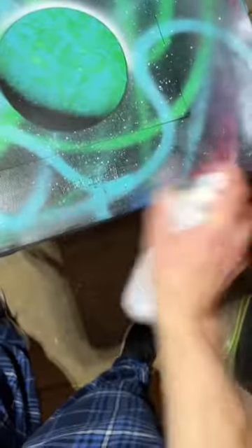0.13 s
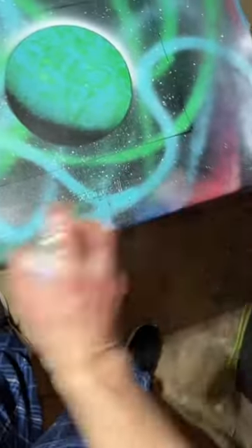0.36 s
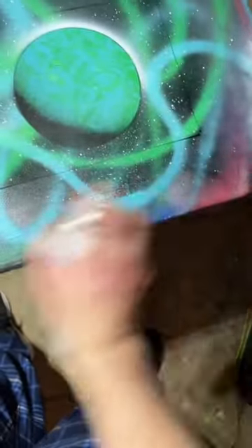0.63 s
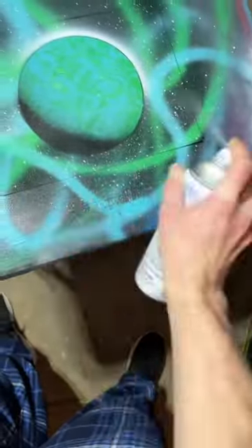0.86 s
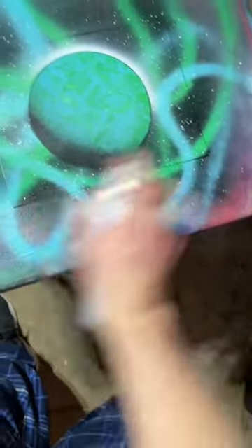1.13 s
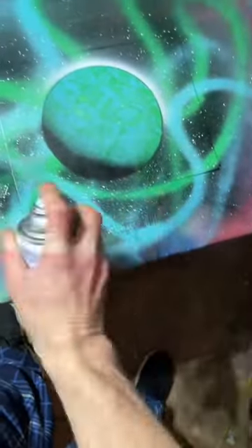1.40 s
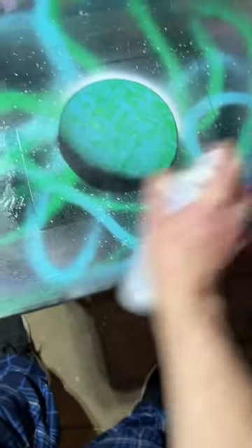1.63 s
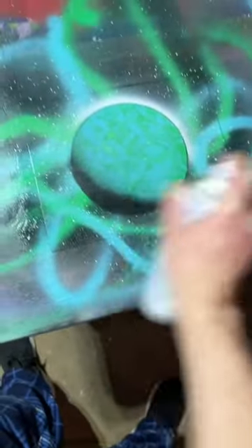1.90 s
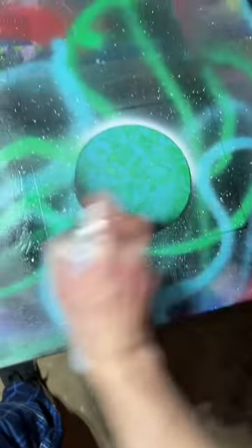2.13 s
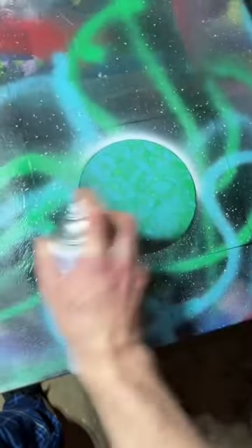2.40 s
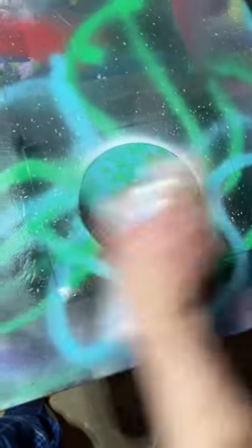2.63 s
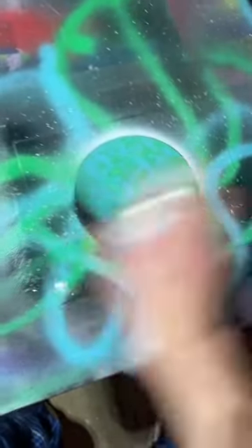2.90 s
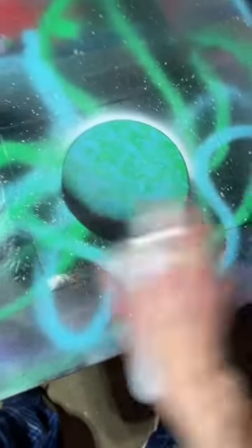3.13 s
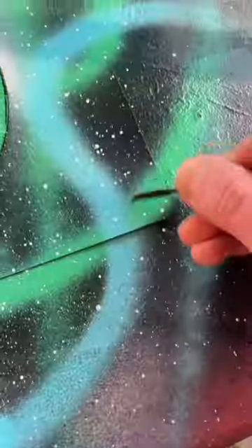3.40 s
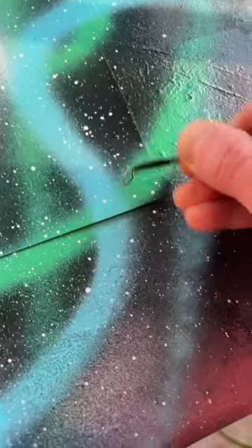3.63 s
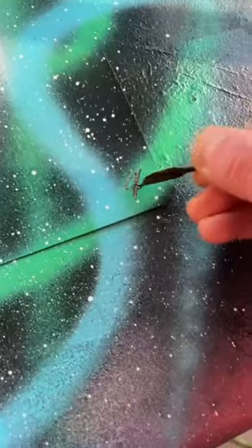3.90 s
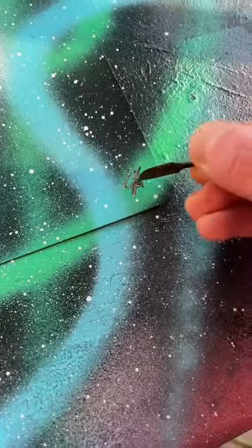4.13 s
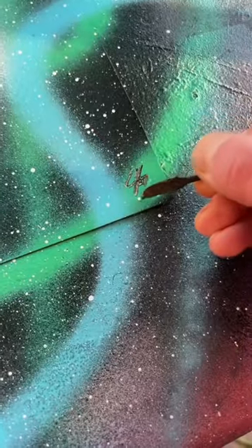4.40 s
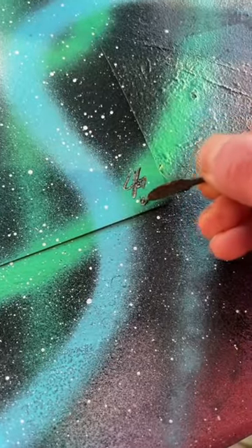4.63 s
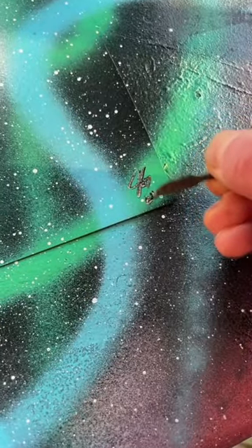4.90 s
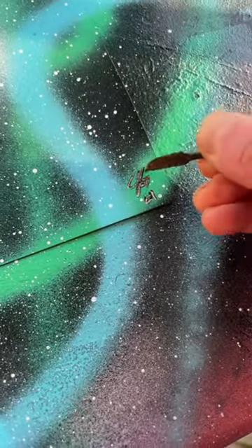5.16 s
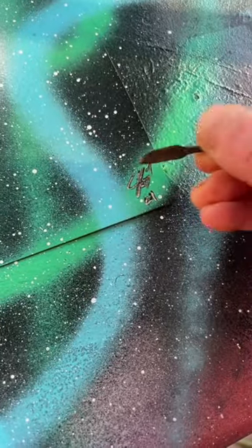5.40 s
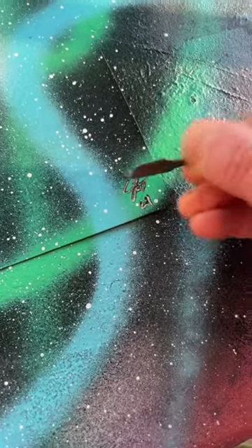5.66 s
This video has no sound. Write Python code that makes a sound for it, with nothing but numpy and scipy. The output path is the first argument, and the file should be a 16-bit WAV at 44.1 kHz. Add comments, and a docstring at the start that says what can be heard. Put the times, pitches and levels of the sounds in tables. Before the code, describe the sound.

Fast, irregular clacking of a ball inside a shaken spray can, then suddenly much quieter: small gritty scrapes, ticks and soft thuds over faint low hum.

```python
"""A mixing ball knocks about inside a shaken paint can: each blow rings wall modes, ticks and leaves a wash.
Light spray hiss, made of flickering coloured noise, and a low noise rumble accompany it.
The scene then changes to a quieter one: a thin blade scratches wet paint in short strokes of gritty noise,
with ticks and sinking board thuds, over a low wavering sine hum and steady air noise."""
import sys
import numpy as np
from scipy import signal
from scipy.io import wavfile
from scipy.ndimage import uniform_filter1d

SR = 44100
rng = np.random.default_rng(int(sys.argv[2]) if len(sys.argv) > 2 else 0)


def field_ratio(decibels):
    """Amplitude ratio for a level in dB (20 dB per decade); scalars and array-likes work."""
    return 10 ** (np.asarray(decibels, dtype=float) / 20)


def digitize_waveform(pressure):
    """Quantize a signal to 16-bit integers and store it at the path in sys.argv[1].

    Rows of a 2-D input are taken as channels; values are limited to [-1, 1].
    """
    field = np.atleast_2d(pressure).T
    bounded = np.clip(field, -1, 1)
    quanta = np.round(bounded * 32767).astype(np.int16)
    wavfile.write(sys.argv[1], SR, quanta)


N = 254748
T = np.arange(N) / SR
# Ball strikes on the steel wall. Each row: start in seconds, ring level in dB, ring centre in Hz,
# crack level in dB before any lift, crack centre in Hz.
BALL_STRIKES = [(.078, -12, 1600, -27.5, 9300), (.083, -29, 1840, -36, 8810),
                (0.111, -21.5, 1500, -35, 8700), (.13, -31, 1770, -44, 9260), (.17, -33, 2230, -20.5, 3520),
                (.2, -22.5, 1390, -43, 9080), (.219, -26, 1820, -49, 8680), (.231, -30.5, 1150, -53, 8720),
                (.308, -19, 2010, -25.5, 3770), (.377, -18.5, 1380, -27.5, 7500),
                (.399, -24, 1880, -35, 9270), (.423, -33, 1010, -34, 8980), (.484, -22.5, 1740, -21, 3410),
                (.603, -16, 1510, -23.5, 3440), (0.646, -19.5, 2370, -23.5, 9540),
                (0.665, -16.5, 1690, -30, 5850), (.734, -24.5, 1560, -35, 9660),
                (.856, -39, 1970, -19, 3800), (0.95, -12.5, 1510, -26.5, 9200),
                (0.96, -26, 1550, -42, 9780), (.99, -18.5, 1380, -35, 9290),
                (1.025, -19, 2180, -26.5, 4020), (1.101, -24, 1300, -31, 9290),
                (1.13, -30, 1190, -34.5, 9500), (1.147, -30, 1260, -40, 9300),
                (1.199, -26, 2900, -19, 3720), (1.335, -14, 1580, -36, 7240), (1.343, -21, 1700, -47, 7200),
                (1.357, -22, 2340, -26.5, 5930), (1.38, -20, 1610, -38, 7190),
                (1.387, -26.5, 1650, -44, 7300), (1.427, -24.5, 1570, -44, 7320),
                (1.452, -27, 2240, -38, 9240), (1.546, -44.5, 2700, -21.5, 3800),
                (1.629, -18.5, 1380, -27, 9620), (1.662, -28, 1380, -47, 9270),
                (1.717, -17.5, 1940, -24, 9300), (1.835, -30.5, 1690, -38.5, 8860),
                (1.923, -25, 1840, -21, 4590), (1.984, -18, 1860, -27.5, 9310),
                (2.009, -29.5, 1150, -36, 8820), (2.033, -31.5, 1150, -36, 9120),
                (2.073, -17.5, 1990, -22.5, 4150), (2.147, -19, 1970, -36, 8940),
                (2.18, -23.5, 1670, -49, 7980), (2.209, -19, 1880, -18, 7600),
                (2.303, -19.5, 1760, -33.5, 9350), (2.323, -26.5, 1170, -35, 8930),
                (2.381, -19, 1610, -21.5, 7160), (2.451, -23.5, 1300, -33.5, 7640),
                (2.477, -29, 1150, -31, 9270), (2.489, -33, 1170, -40, 3640),
                (2.513, -21.5, 1730, -17.5, 4340), (2.587, -22.5, 1690, -36, 9450),
                (2.596, -21.5, 1690, -33, 9260), (2.684, -16, 2130, -22.5, 7170),
                (2.73, -27.5, 1180, -28.5, 3160), (2.748, -29.5, 1040, -33, 6950),
                (2.777, -22.5, 1740, -19, 9620), (2.814, -25, 1680, -28.5, 7100),
                (2.828, -23.5, 1670, -31.5, 8990), (2.915, -20.5, 1920, -26, 8100),
                (2.972, -16, 1650, -30, 6100), (2.986, -20, 1730, -20, 4700),
                (3.002, -21, 1750, -20.5, 4610), (3.013, -15, 3120, -35, 3360),
                (3.018, -18.5, 1750, -25.5, 3390), (3.031, -23, 1700, -35, 3500),
                (3.108, -18, 2320, -31, 4430), (3.135, -21, 1530, -44, 4530), (3.148, -31, 1640, -38, 9820),
                (3.201, -33, 1820, -19.5, 4740), (3.223, -12, 1920, -25, 4180),
                (3.243, -20, 2030, -34, 7640), (3.264, -22, 1670, -47, 8990), (3.281, -19, 1640, -37, 9760),
                (3.34, -29, 1670, -21.5, 4670), (3.366, -26, 1790, -25, 6200)]


def evened(x):
    """Scales to rms 1."""
    return x / np.sqrt(np.mean(x ** 2) + 1e-20)


def add(mix, s, sound):
    """Mixes a sound in at time s, in seconds."""
    part = mix[max(round(s * SR), 0):][:len(sound)]
    part += sound[:len(part)]


def noise(colour, patchy_db, size=512):
    """Random short-time spectra of a given colour, with drifting louder and softer patches; rms 1."""
    hz = np.fft.rfftfreq(size, 1 / SR)
    frames = 4 * N // size + 5
    real, imaginary, patches = rng.standard_normal((frames, len(hz), 3)).T
    patches = uniform_filter1d(patches, size // 64, 0)  # smooth across frequency
    patches = evened(uniform_filter1d(patches, 8192 // size, 1))  # smooth across time
    colour_hz, colour_db = np.transpose(colour)
    shape_db = np.interp(np.log(hz + 1), np.log(colour_hz + 1), colour_db)[:, None]
    spectra = (real + 1j * imaginary) * field_ratio(shape_db + patchy_db * patches)
    return evened(signal.istft(spectra, nperseg=size, noverlap=3 * size // 4)[1][:N])


def spatter(depth_db, per_s):
    """A flickering gain: random decibels smoothed over 1 / per_s seconds, mean power 1."""
    flicker = uniform_filter1d(rng.standard_normal(N), max(int(SR / per_s), 1))
    return evened(field_ratio(depth_db * evened(flicker)))


def air():
    """Steady background air: noise weighted to the bass."""
    # Spectrum of the air. Each row: frequency in Hz, relative density in dB per Hz.
    colour = [(18, -57), (30, -13), (86, -5.5), (146, -1.5), (206, -9.5), (340, -14.5), (1060, -14),
              (2000, -19.5), (2890, -32.5), (4770, -40), (8310, -41.5), (13700, -39.5), (15200, -38),
              (16500, -56)]
    return field_ratio(-50.5) * noise(colour, patchy_db=0.5, size=2048)


def rumble():
    """Low workshop noise that swells with the arm swings, rising and falling exponentially in dB."""
    # Spectrum of the rumble. Each row: frequency in Hz, relative density in dB per Hz.
    colour = [(20, -14), (40, -6), (74, 8.5), (110, -11.5), (180, -32), (400, -32)]
    # Swells of the rumble. Each row: centre in seconds, rise over the resting level in dB.
    swells = [(.53, 8), (.91, 6), (1.28, 7.5), (1.87, 11.5), (2.22, 6.5), (2.47, 15), (2.6, 8), (2.87, 9)]
    swell_db = sum(db * np.exp(-abs(T - s) / 0.057) for s, db in swells)
    return field_ratio(-57 + swell_db) * noise(colour, patchy_db=2, size=4096)


def hum():
    """A low sine that wavers in pitch and trembles in level."""
    # Path of the hum. Each row: time in seconds, pitch in Hz, relative level in dB.
    path = [(3.43, 138.2, -51), (3.48, 129.7, -61.5), (3.68, 143.6, -52), (3.8, 154.6, -52.5),
            (3.88, 136, -55), (4.01, 156.2, -48), (4.48, 156, -50), (4.6, 143.1, -64), (4.66, 131.2, -51),
            (4.72, 157.3, -49), (4.87, 158.6, -51.5), (4.93, 144.3, -59), (5.07, 139, -59),
            (5.17, 131.2, -46.5), (5.57, 129.8, -44.5), (5.61, 135, -49.5), (5.78, 131, -83.5)]
    s, hz, db = np.transpose(path)
    phase = 2 * np.pi * np.cumsum(np.interp(T, s, hz)) / SR
    level = np.sqrt(2) * field_ratio(np.interp(T, s, db))
    return level * np.sin(phase) * spatter(depth_db=1.5, per_s=17)


def thuds():
    """The board flexes under the blade: a decaying low sine whose pitch falls as the board settles."""
    # Board flexings. Each row: start in seconds, relative level in dB.
    flexings = [(3.452, -38), (3.957, -35), (4.441, -40), (4.519, -35), (4.58, -39), (4.645, -30.5),
                (4.79, -38), (4.924, -32), (5.325, -38), (5.56, -28), (5.668, -31)]
    board_hz, sag_per_s, t60_s = 122, 7.2, 0.063
    out = np.zeros(N)
    t = np.arange(SR // 5) / SR
    cycles = board_hz * (1 - np.exp(-sag_per_s * t)) / sag_per_s
    swing = (1 - np.exp(-t / 0.0039)) * np.sin(2 * np.pi * cycles)
    for s, db in flexings:
        add(out, s, field_ratio(db - 60 * t / t60_s) * swing)
    return out


def slips():
    """The blade tip snaps free: very short decaying noise, differentiated to brighten it."""
    # Snaps of the tip. Each row: start in seconds, relative level in dB.
    snaps = [(3.4745, -18), (3.697, -14), (3.7976, -46), (3.9317, -31), (3.9762, -30), (4.0637, -11.5),
             (4.2646, -15), (4.3697, -54), (4.4463, -55), (4.58, -41), (4.666, -18.5), (4.7105, -26),
             (4.835, -29), (4.95, -25), (4.9831, -27), (5.3548, -14), (5.689, -15)]
    out = np.zeros(N)
    t = np.arange(400) / SR
    for s, db in snaps:
        tick = np.diff(rng.standard_normal(400) * field_ratio(-60 * t / 0.003))
        add(out, s, field_ratio(db + 2) * tick / abs(tick).max())
    return out


def blade():
    """Scraping grit as flickering noise: each stroke swells and fades with its own treble balance."""
    # Blade strokes. Each row: centre in seconds, relative level in dB, length in ms,
    # tilt toward the lower treble in dB before a common lift.
    strokes = [(3.471, -32.5, 27.6, -1.5), (3.652, -62.5, 27, -1), (3.696, -35.5, 34, -5.5),
               (3.73, -60, 46, -2), (3.805, -57, 34, 2), (3.933, -30, 24.6, -5.5), (3.971, -55, 32, -2),
               (4.031, -64, 16, -5), (4.065, -30, 25, -7.5), (4.225, -67, 14.6, 3),
               (4.261, -30.5, 28.3, -10), (4.37, -60, 11.8, 2), (4.45, -63, 17, 2),
               (4.589, -43.5, 31, -4.5), (4.666, -47, 27, -4.5), (4.709, -46, 25, -12),
               (4.826, -43.5, 30.6, 0), (4.937, -35, 32.4, -5), (4.987, -39, 31, -17),
               (5.062, -67, 20, 4.5), (5.326, -64, 28, -6), (5.355, -34, 25.5, -3), (5.604, -68.5, 60, .5),
               (5.684, -33, 29.6, -5.5)]
    # Spectrum of the scrape. Each row: frequency in Hz, relative density in dB per Hz.
    colour = [(880, -54), (1500, -22), (3550, -15), (4010, -5), (5990, -8), (8770, -11.5), (9690, -6.5),
              (10500, -20), (14300, 2), (16000, -3.5), (16500, -28)]
    dull, bright = np.zeros((2, N))
    for s, db, ms, tilt_db in strokes:
        along = (T - s) / (ms / 2000)  # -1 at the start, 1 at the end
        squareness = np.interp(db, [-45, -28], [2.1, 1.73])  # harder strokes swell to a sharper point
        swell_db = db - 14 * abs(along) ** squareness
        dull += field_ratio(swell_db + tilt_db + 5)
        bright += field_ratio(swell_db)
    grit = noise(colour, patchy_db=2, size=256) * spatter(depth_db=3, per_s=2500)
    low = signal.sosfiltfilt(signal.butter(2, 9000, fs=SR, output="sos"), grit)
    drag = field_ratio(-19.5) * uniform_filter1d(bright, 2500) * grit  # faint, before and after each stroke
    return dull * low + bright * (grit - low) + drag


def spray():
    """Gas and droplets hiss through the nozzle: each shake refills the flow, which then sags."""
    # Spectrum of the hiss. Each row: frequency in Hz, relative density in dB per Hz.
    colour = [(120, -7), (200, -16.5), (860, -10.5), (1090, -7), (1440, -6), (1700, -8), (2330, -2),
              (3020, -12), (3910, -4), (5450, -9), (9310, -0.5), (11200, -8), (14000, 3), (15600, 2.5),
              (16500, -25)]
    # Shakes that throw paint at the valve. Each row: start in seconds, sag in dB per second.
    surges = [(0, 96), (.078, 17), (.17, 9), (.307, 18), (.484, 50), (.645, 9), (.855, 70), (1.025, 21),
              (1.197, 28), (1.335, 10), (1.546, 57), (1.631, 52), (1.717, 9.5), (1.923, 22), (2.073, 13.5),
              (2.21, 40), (2.381, 47), (2.513, 18), (2.777, 38), (2.915, 76), (2.985, 17), (3.107, 34),
              (3.2, 8)]
    # Shakes just before which the valve starves. Each entry: time in seconds.
    chokes = [.169, .307, .855, .95, 1.544, 1.923, 2.915, 3.107]
    full_db, lowest_sag_db = -33.5, -35.5
    choke_s, choke_db = 0.054, -5
    start, sag_db = np.transpose(surges)
    last = np.clip(np.searchsorted(start, T) - 1, 0, None)
    flow_db = np.maximum(full_db - sag_db[last] * (T - start[last]), lowest_sag_db)
    for s in chokes:
        flow_db += choke_db * np.clip(1 - (s - T) / choke_s, 0, 1) * (T < s)
    flow = field_ratio(uniform_filter1d(flow_db, size=200))
    return flow * noise(colour, patchy_db=2.67) * spatter(depth_db=1.08, per_s=790)


def thumps():
    """Dull push of the heavier blows through can and hand: very short decaying sines."""
    # Heavier blows. Each row: start in seconds, level in dB before a common lift.
    pushes = [(.198, -41), (.306, -29), (.373, -33.5), (1.098, -33.5), (1.129, -39), (1.332, -32.5),
              (1.718, -34.5), (1.984, -39), (2.07, -32.5), (2.145, -28), (2.175, -32.5), (2.38, -25.5),
              (2.449, -35), (2.477, -36), (2.488, -38), (2.585, -35), (2.682, -26), (2.727, -29.5),
              (2.748, -33), (2.969, -25.5), (3.107, -31.5), (3.131, -31.5), (3.221, -31)]
    out = np.zeros(N)
    t = np.arange(SR // 4) / SR
    for s, db in pushes:
        add(out, s + 0.002, field_ratio(db + 4.5 - 60 * t / 0.006) * np.sin(2 * np.pi * 690 * t))
    return out


def wash():
    """Each blow leaves a dying, flickering noise whose power follows its crack and, less, its ring."""
    # Spectrum of the wash. Each row: frequency in Hz, relative density in dB per Hz.
    colour = [(410, -46.5), (700, -29), (1270, -15.5), (1650, -1.5), (3000, -5.5), (3510, -2.5),
              (6540, -7.5), (9100, -2.5), (11500, -13.5), (14300, 2.5), (15900, -20.5), (16500, -25)]
    power = np.zeros(N)
    t = np.arange(SR // 4) / SR
    dying = field_ratio(-120 * t / 0.13) * (1 - np.exp(-t / 0.00057))  # as power: falls 60 dB in 0.13 s
    for s, ring_db, _, crack_db, _ in BALL_STRIKES:
        from_crack = field_ratio(-29.5 + 0.93 * (crack_db + 25)) ** 2
        from_ring = field_ratio(ring_db - 25.5) ** 2
        add(power, s, (from_crack + from_ring) * dying)
    return np.sqrt(power) * noise(colour, patchy_db=5, size=256) * spatter(depth_db=2.5, per_s=1900)


def steel_ticks():
    """Steel on steel ticks with each crack: a tiny burst of treble noise."""
    level = np.zeros(N)
    t = np.arange(SR // 4) / SR
    for s, _, _, crack_db, _ in BALL_STRIKES:
        add(level, s - 0.0005, field_ratio(crack_db + 6 - 60 * t / 0.0025))
    treble = signal.butter(2, [6000, 16000], "band", fs=SR, output="sos")
    return level * evened(signal.sosfilt(treble, rng.standard_normal(N)))


def struck(centre_hz, phase, narrow_db, rise_s, lasting):
    """Decaying wall modes, weaker by narrow_db per octave away from the centre; peak 1."""
    # Modes of the can wall. Each row: frequency in Hz, relative level in dB, 60 dB fall time in seconds.
    modes = [(1043, 4.5, 0.015), (1150, -7.5, 0.053), (1380, -1.5, 0.022), (1510, 2.5, 0.0073),
             (1670, -1, 0.03), (1750, -2, 0.03), (1840, -2.5, 0.018), (2254, 8.5, 0.0082),
             (2607, -0.5, 0.014), (3570, 6, 0.007), (4030, 3, 0.0083), (4500, 3.5, 0.012),
             (5220, 2.5, 0.0058), (6030, -1.5, 0.013), (7170, -4, 0.077), (7980, -1.5, 0.027),
             (8810, -13, 0.013), (9260, 1.5, 0.0119)]
    hz, db, t60 = np.transpose(modes)[:, :, None]
    t = np.arange(SR // 10) / SR
    near_db = -narrow_db * abs(np.log2(hz / centre_hz))
    swings = field_ratio(db + near_db - 60 * t / t60) * np.sin(2 * np.pi * (hz * t + phase))
    # the gripping hand damps the first swing fast
    ring = swings.sum(0) * (1 - np.exp(-t / rise_s)) * (lasting + np.exp(-t / 0.0014))
    return ring / abs(ring).max()


def rattle():
    """Each ball blow rings low and high wall modes and rebounds, with thumps, ticks and a wash."""
    rings = thumps()
    phases = rng.random((len(BALL_STRIKES), len([(1043, 4.5, 0.015), (1150, -7.5, 0.053),
                                                 (1380, -1.5, 0.022), (1510, 2.5, 0.0073), (1670, -1, 0.03),
                                                 (1750, -2, 0.03), (1840, -2.5, 0.018), (2254, 8.5, 0.0082),
                                                 (2607, -0.5, 0.014), (3570, 6, 0.007), (4030, 3, 0.0083),
                                                 (4500, 3.5, 0.012), (5220, 2.5, 0.0058),
                                                 (6030, -1.5, 0.013), (7170, -4, 0.077),
                                                 (7980, -1.5, 0.027), (8810, -13, 0.013),
                                                 (9260, 1.5, 0.0119)]), 1))
    hops = rng.random((len(BALL_STRIKES), 3, 2))
    for (s, ring_db, ring_hz, crack_db, crack_hz), phase, hop in zip(BALL_STRIKES, phases, hops):
        ring = field_ratio(ring_db) * struck(ring_hz, phase, narrow_db=23, rise_s=0.00088, lasting=1.3)
        crack = field_ratio(crack_db + 6) * struck(crack_hz, phase, narrow_db=14, rise_s=0.00066, lasting=0.21)
        add(rings, s - 0.0006, ring + crack)
        # the ball chatters on the wall: three rebounds, each later and weaker
        after_s = np.cumsum(0.003 + 0.006 * hop[:, 0])
        weaker_db = np.cumsum(8 + 7 * hop[:, 1])
        for later_s, drop_db in zip(after_s, weaker_db):
            add(rings, s + later_s, field_ratio(-drop_db) * (ring + 0.34 * crack))
    no_bass = signal.butter(2, 300, "high", fs=SR, output="sos")  # a small can sends out little bass
    return signal.sosfilt(no_bass, rings) + steel_ticks() + wash()


def scene():
    """The can, then the blade, joined by a quick crossfade; the can's level dips briefly before the end."""
    cut_s, fade_out_s, fade_in_s, fade_db = 3.42, 0.061, 0.04, -43
    dip_s, dip_end_s, dip_db = 3.354, 3.354 + 0.0087, -22
    fade_out = np.clip(1 - (cut_s - T) / fade_out_s, 0, 1) ** 3.1
    dip = uniform_filter1d((T > dip_s) * (T < dip_end_s) * 1.0, size=60)
    can = (rumble() + spray() + rattle()) * field_ratio(fade_db * fade_out + dip_db * dip)
    fade_in = np.clip((dip_end_s + fade_in_s - T) / fade_in_s, 0, 2)
    scratching = (air() + hum() + thuds() + slips() + blade()) * field_ratio(fade_db * fade_in - 2)
    return (can * (T < cut_s) + scratching)[None]


def roll_off(x):
    """The treble ends steeply here."""
    return signal.sosfilt(signal.butter(12, 16970, fs=SR, output="sos"), x)


def record(dry):
    """Cuts the treble steeply around 15.9 kHz and returns the finished sound."""
    edge = signal.firwin(301, 15900, window=("kaiser", 8), fs=SR)
    mix = signal.oaconvolve(dry, edge[None], "same")
    return roll_off(mix)


dry = scene()
out = record(dry)
digitize_waveform(out)
```